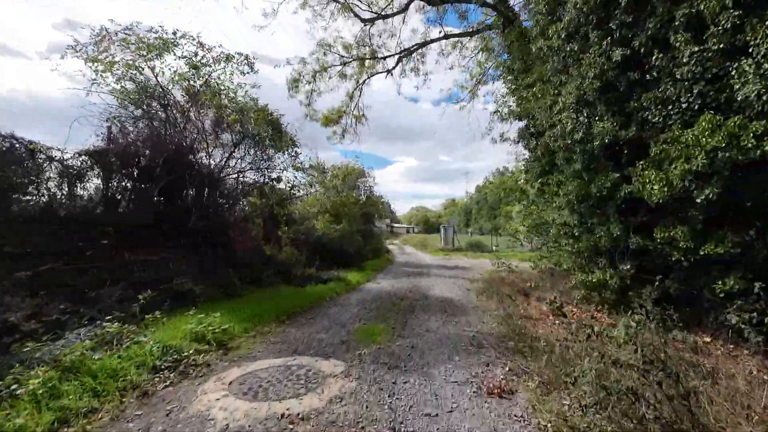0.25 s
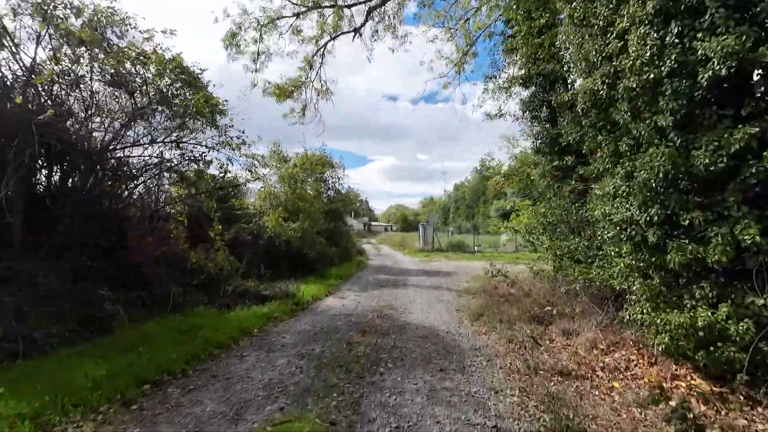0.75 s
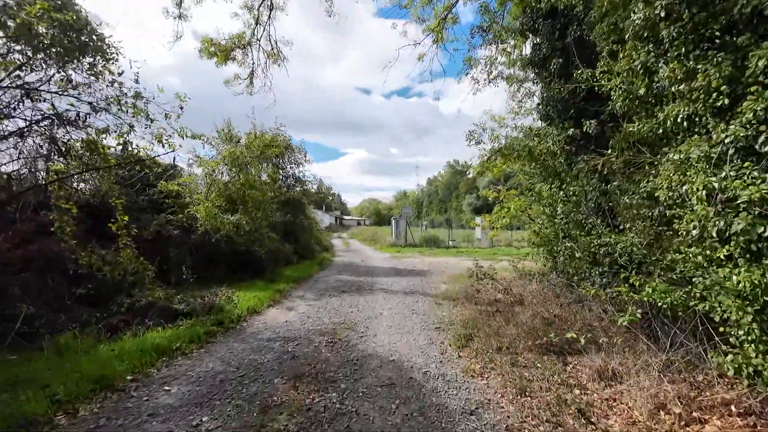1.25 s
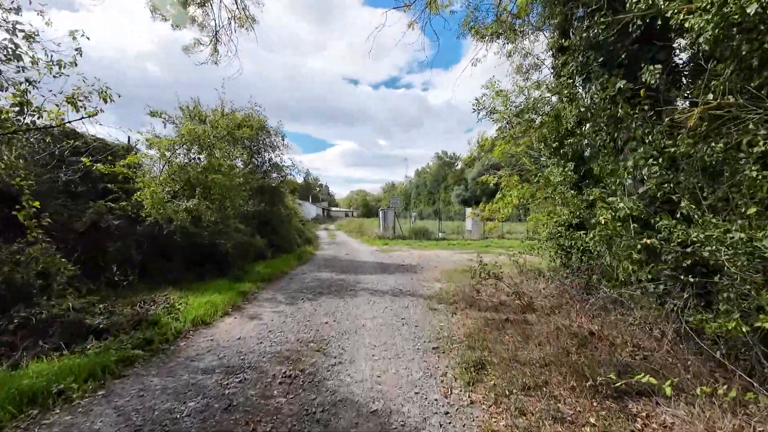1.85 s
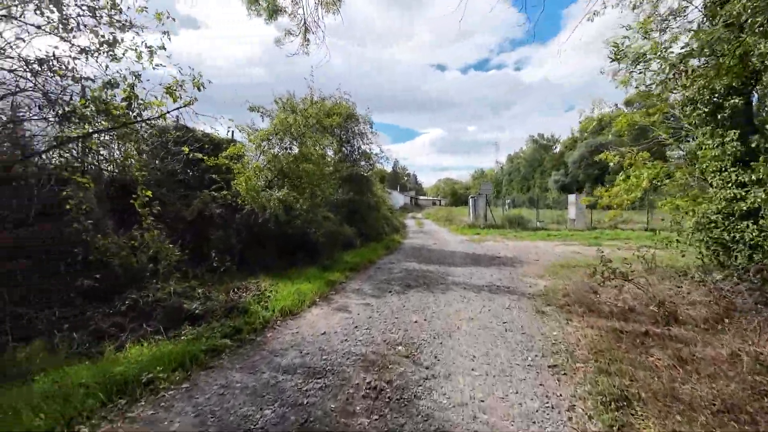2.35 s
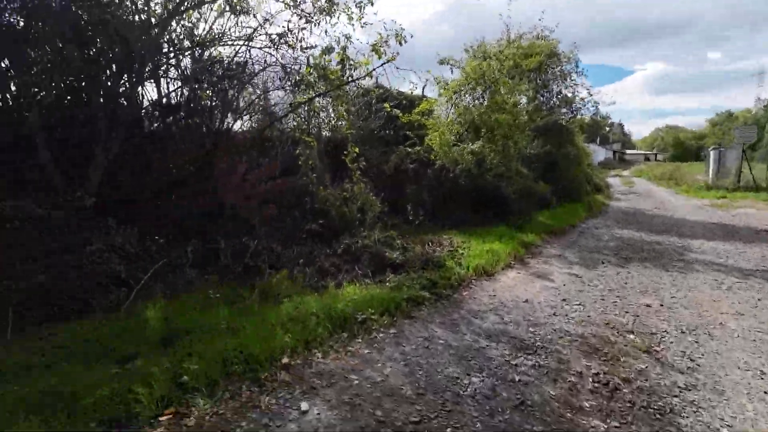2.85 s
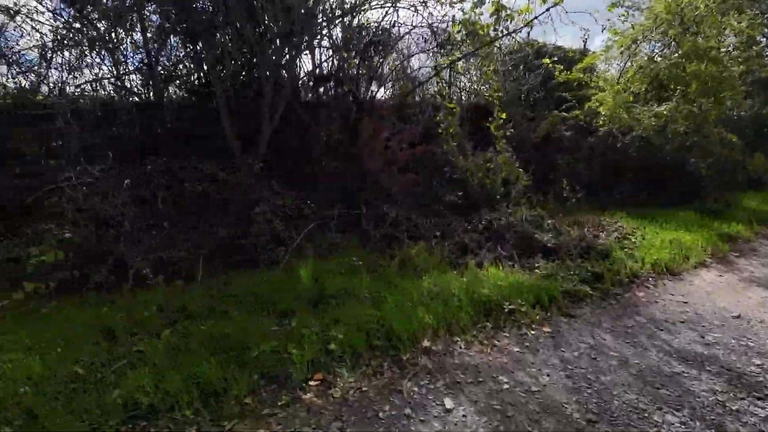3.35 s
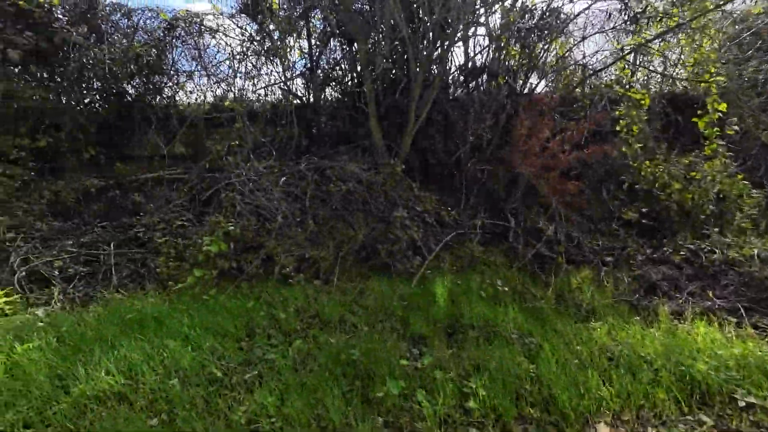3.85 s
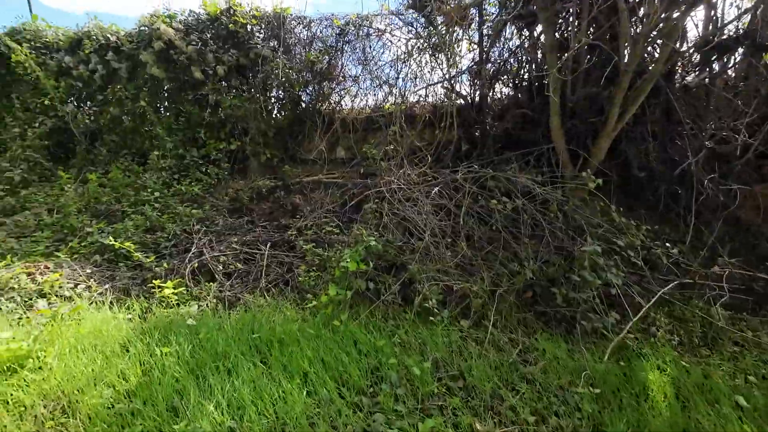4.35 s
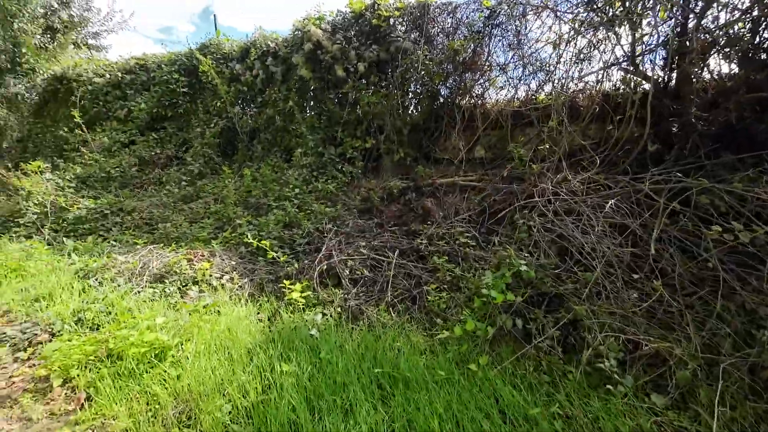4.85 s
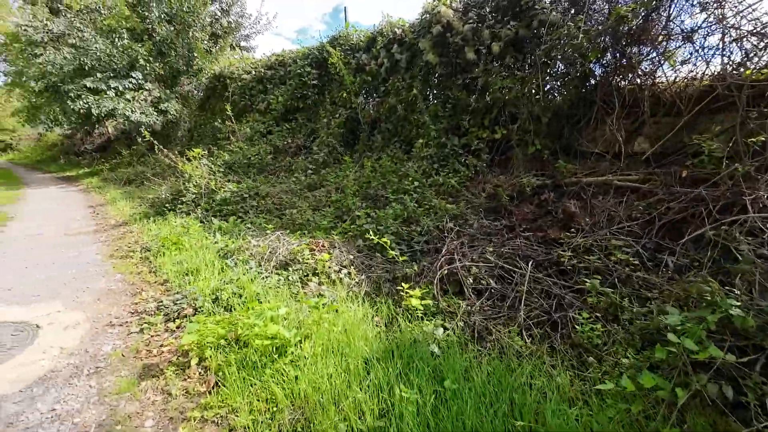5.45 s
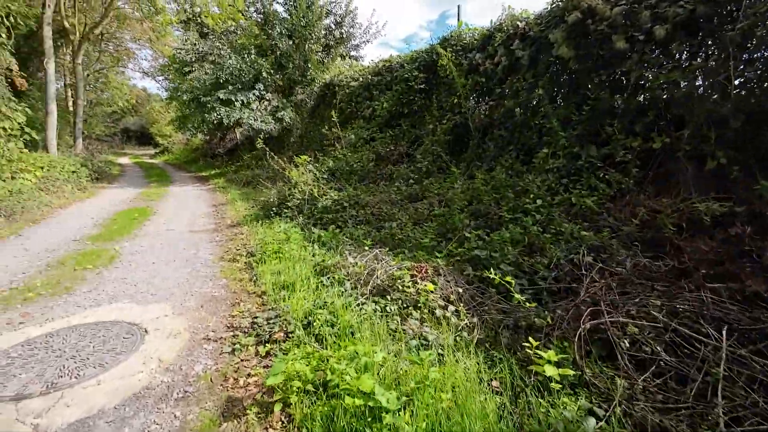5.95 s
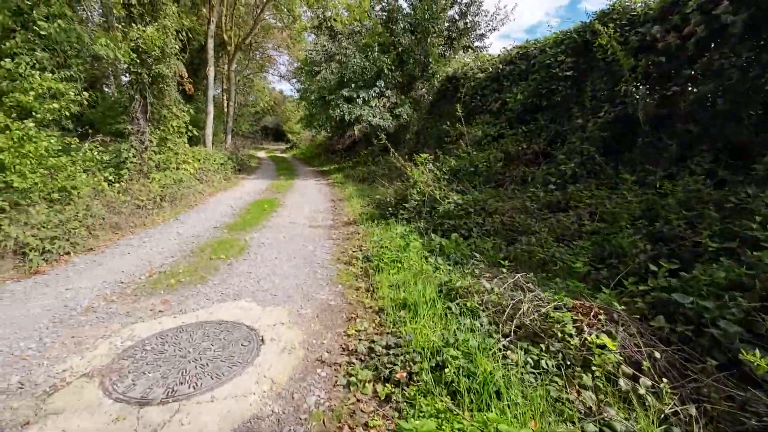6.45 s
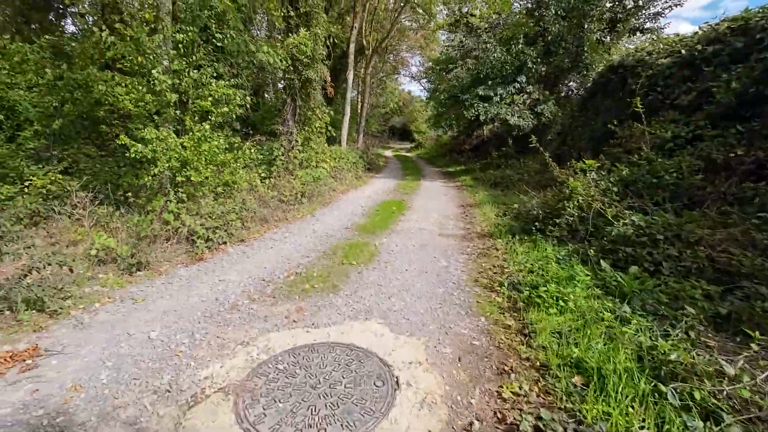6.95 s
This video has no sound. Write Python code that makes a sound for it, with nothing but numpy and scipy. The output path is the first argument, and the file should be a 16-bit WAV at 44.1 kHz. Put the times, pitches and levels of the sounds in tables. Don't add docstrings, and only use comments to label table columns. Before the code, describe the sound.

A microphone mounted on a bicycle frame picks up rumbling jolts, tyre crunch and sharp snapping stones, strongest at first. The ride eases into single pops, brittle clicks and a very thin brake whine, with a clump of gravel as it turns. Then come a quiet pause, a dull knock, leafy swishes and a last scuff of stones. Dry outdoor track, no echo.

```python
import sys
import numpy as np
from scipy import signal
from scipy.fft import rfft, irfft, next_fast_len
from scipy.io import wavfile
from scipy.ndimage import uniform_filter1d, map_coordinates

SR = 44100
rng = np.random.default_rng(int(sys.argv[2]) if len(sys.argv) > 2 else 0)


def generate_wav(sig):
    pcm = np.round(np.clip(np.atleast_2d(sig).T, -1, 1) * 32767).astype(np.int16)
    wavfile.write(sys.argv[1], SR, pcm)


def boost_factor(decibels):
    exponent = np.asarray(decibels, float) / 20
    return 10 ** exponent


N = 317961

# frequency in Hz, level in dB.
CRUNCH_TONE = [(260, -26), (450, 2.5), (728, -4.5), (1320, 8), (2690, -7.5), (3140, -11), (3720, -10),
               (4500, -21), (6500, -17), (8450, -63), (14300, -120)]
# frequency in Hz, level in dB.
RUSTLE_TONE = [(1060, -43), (1800, -18), (2450, -3.5), (4470, -11), (5410, -5.5), (6850, -14), (7500, -9),
               (8910, -17.5), (9940, -12.5), (11100, -12), (13500, -23.5), (15100, -17.5), (15800, -20.5)]


def unit(x):
    return x / np.sqrt(np.mean(x ** 2) + 1e-20)


def along(points, hz):
    f, v = np.transpose(points)
    return np.interp(np.log(hz + 1), np.log(f + 1), v)


def curves(rows):
    s, *cols = np.transpose(rows)
    return [np.interp(np.arange(N) / SR, s, c) for c in cols]


def wobble(rate):
    knots = rng.standard_normal(int(N * 200 / SR) + 4)
    return map_coordinates(knots, [np.arange(N) * rate / SR])


def noise():
    return rng.standard_normal(N)


def filtered(x, response):
    m = next_fast_len(N + 8192)
    return irfft(rfft(x, m) * response(np.fft.rfftfreq(m, 1 / SR)), m)[..., :N]


def coloured(x, spectrum):
    return unit(filtered(x, lambda hz: boost_factor(along(spectrum, hz))))


def placed(s, shapes):
    at = np.round(s * SR).astype(int)[:, None] + np.arange(shapes.shape[1])
    return np.bincount(at.ravel(), shapes.ravel(), N + SR)[:N]


def pops(s, db, hz, t60, rise, size):
    t = np.arange(size) / SR
    fall = boost_factor(db[:, None] - 60 * t / t60[:, None])
    soft_start = 1 - np.exp(-(t / rise) ** 2)
    return placed(s, fall * soft_start * np.sin(2 * np.pi * hz[:, None] * t))


def grit(count, spread_db):
    s, size, sign = rng.random((count, 3)).T
    height = boost_factor(-spread_db * np.log(size + 0.0028))
    return placed(s * N / SR, (np.sign(sign - .5) * height)[:, None])


def gravel(count, centre_hz, spread, size_db, swings=3):
    s, pitch, life, size = rng.random((count, 4)).T
    hz = centre_hz * np.exp(spread * (pitch - .5))
    t60 = swings * (1 + 1.7 * life) / hz
    return unit(pops(s * N / SR, -size_db * np.log(size + 0.046), hz, t60, rise=0.0002, size=700))


def clicks(s, db, hz, above_db, below_db, t60):
    size = 2048
    t = np.arange(size) / SR
    fall = boost_factor(-60 * t / (0.32 * t60)) + 0.41 * boost_factor(-60 * t / t60)
    burst = fall * (1 - np.exp(-t / 0.00059)) * rng.standard_normal((len(s), size))
    octaves = np.log2((np.fft.rfftfreq(size, 1 / SR) + 20) / hz)
    tilt_db = np.where(octaves > 0, above_db, below_db) * octaves
    bumpy = uniform_filter1d(rng.standard_normal((len(s), size // 2 + 1)), size=40, axis=1)
    click = irfft(rfft(np.roll(burst, 64, axis=1)) * boost_factor(tilt_db + 2.4 * unit(bumpy)))
    peak = np.abs(click).max(axis=1, keepdims=True)
    return placed(s - .001, boost_factor(db[:, None] - 3.5) * click / peak)


def wind():
    # time in seconds, strength in dB.
    strength = [(0.0, -25), (0.24, -22), (0.5, -31), (0.58, -21.5), (0.66, -40), (1.02, -20), (1.06, -31),
                (1.22, -27.5), (3.17, -44.5), (4.42, -46), (5.76, -60), (6.87, -53), (6.91, -35),
                (7.21, -39)]
    # frequency in Hz, level in dB.
    buffet = [(9, -41), (15, 2), (36, 4.5), (48, -13), (70, -71), (100, -120)]
    return boost_factor(curves(strength)[0]) * unit(boost_factor(0.53 * wobble(13)) * coloured(noise(), buffet))


def ride():
    # time in seconds, strength in dB.
    shaking = [(0.0, -23), (0.2, -22), (0.7, -29), (1.32, -28.5), (1.55, -36), (1.83, -33.5), (1.91, -36),
               (3.23, -42.5), (4.36, -39.5), (4.54, -32.5), (4.62, -44), (5.0, -48.5), (5.14, -38),
               (5.34, -53.5), (6.65, -46), (6.73, -49.5), (6.99, -34), (7.21, -42)]
    # time in seconds, crunch in dB.
    loose = [(0.0, -34), (0.14, -32.5), (0.38, -35), (0.8, -33.5), (1.36, -36.5), (1.97, -42.5),
             (2.27, -43.5), (2.55, -39.5), (2.89, -47), (3.21, -53), (4.4, -40), (4.6, -52.5),
             (5.38, -56.5), (6.14, -48.5), (6.43, -53), (7.21, -47.5)]
    # frequency in Hz, level in dB.
    rumble_tone = [(25, -22), (46, -0.5), (68, 2), (84, 1), (100, -3.5), (189, -13), (300, -17), (390, -24),
                   (660, -120)]
    # frequency in Hz, level in dB.
    drone_tone = [(76, -20), (130, 1.5), (231, -9.5), (385, -4.5), (600, -5.5), (900, -12), (1170, -11.5),
                  (1980, -120)]
    # centre in Hz, half width in Hz, level in dB.
    tube_rows = [
        (394, 14, -9.5),
        (743, 11, -10),
    ]

    def tubes(hz):
        return 1 + sum(boost_factor(db) / (1 + 1j * (hz - centre) / width) for centre, width, db in tube_rows)

    rumble_db, crunch_db = curves(shaking)[0], curves(loose)[0]
    drone_gain = np.hypot(boost_factor(-42.5 + 0.75 * (rumble_db + 28.0)), boost_factor(-53.5))
    rustle_db = -61.5 + 0.69 * (crunch_db + 41.5)

    bumps = wobble(14)
    shake = coloured(noise(), rumble_tone)
    lopsided = shake + 0.19 * (shake ** 2 - 1)
    rumble = unit(boost_factor(1.5 * bumps) * lopsided)

    ringing = filtered(coloured(noise(), drone_tone), tubes)
    drone = unit(boost_factor(2.3 * bumps + 1.27 * wobble(40)) * ringing)

    crushed = 0.65 * gravel(count=5000, centre_hz=1300, spread=1.27, size_db=3.5)
    crushed += 0.5 * coloured(noise(), CRUNCH_TONE)
    crunch = unit(boost_factor(0.5 * bumps + 2.96 * wobble(55)) * crushed)

    blades = noise() + unit(grit(count=3000, spread_db=1.5))
    rustle = unit(boost_factor(2.2 * bumps + 0.89 * wobble(21.74)) * coloured(blades, RUSTLE_TONE))
    return (boost_factor(rumble_db + 0.98) * rumble + drone_gain * drone
            + boost_factor(crunch_db - 2.77) * crunch + boost_factor(rustle_db) * rustle)


def brushes():
    # peak time in seconds, rise and fall in seconds per 20 dB (a negative fall holds), peak in dB.
    swells = [(2.894, 0.005, 0.09, -48.5), (3.058, 0.016, 1, -63), (3.505, 0.0086, 0.8, -68),
              (4.7, 0.48, 2, -62), (5.69, 0.2, 0.28, -50.5), (5.98, 0.15, 0.6, -57), (6.4, 2, 5.5, -67.5),
              (6.75, 0.18, 0.5, -53), (7.19, 0.17, -5, -55.5)]
    t = np.arange(N) / SR
    leaves = noise() + 1.34 * unit(grit(count=5000, spread_db=0.5))
    leaves = unit(boost_factor(1.77 * wobble(45)) * coloured(leaves, RUSTLE_TONE))
    swell = np.zeros(N)
    for s, rise, fall, db in swells:
        away = np.maximum((s - t) / rise, (t - s) / fall)
        swell += boost_factor(db - 20 * away.clip(0, 6))
    return swell * leaves


def freewheel():
    # time in seconds, clicks per second.
    coasts = [
        [(1.525, 16), (1.95, 14.8), (2.25, 10)],
        [(4.563, 32.4), (4.86, 35), (5.04, 17)],
    ]
    # frequency in Hz, level in dB.
    tones = [
        [(9000, -30), (12500, -6), (15000, 0)],
        [(3000, -4), (5500, 2), (15000, -8)],
    ]
    levels_db, widths_s = [-69, -57.5], [.008, 0.004]
    t, out = np.arange(N) / SR, np.zeros(N)
    for rows, db, width, tone in zip(coasts, levels_db, widths_s, tones):
        coasting = (t > rows[0][0]) * (t < rows[-1][0])
        teeth = np.cumsum(curves(rows)[0] * coasting) / SR
        s = np.flatnonzero(np.diff(np.floor(teeth))) / SR
        u = np.arange(-800, 800) / SR / width
        height = boost_factor(db + 1.9 * rng.standard_normal((len(s), 1)))
        puffs = placed(s - 800 / SR, height * np.exp(-u * u))
        out += puffs * coloured(noise(), tone)
    return out


def brake():
    # start in seconds, length in seconds, level in dB.
    drags = [
        (3.72, .16, -68),
        (3.99, .05, -71),
        (4.12, .16, -67),
        (4.36, .2, -69),
    ]
    sing_hz, fade_s = 15740, .015
    t = np.arange(N) / SR
    grips = np.zeros(N)
    for s, length, db in drags:
        inside = np.minimum(t - s, s + length - t)
        grips += boost_factor(db) * np.clip(inside / fade_s + .5, 0, 1)
    graze = boost_factor(-77) * (t > 3.9) * (t < 4.62)
    return boost_factor(1) * (grips + graze) * np.sin(2 * np.pi * sing_hz * t + .3 * wobble(20))


def ticks():
    # time in seconds, rattle peak in dB, push in dB.
    jolts = [(0.0302, -22, -7.5), (0.0686, -31.5, -32), (0.099, -27.5, -23), (0.1257, -39, -9.5),
             (0.158, -32, -14.5), (0.1892, -39, -14.5), (0.2334, -34, -12), (0.2537, -29.5, -10.5),
             (0.2935, -33, -10), (0.348, -36, -35), (0.382, -29.5, -7), (0.418, -35, -15),
             (0.4428, -31, -13), (0.4872, -32, -15), (0.5141, -33, -18), (0.53, -31, -15),
             (0.546, -23.5, -17), (0.5866, -44, -16), (0.6114, -28, -18.5), (0.6666, -30.5, -25),
             (0.6948, -34, -28), (0.7563, -31.5, -25), (0.83, -37, -31), (0.852, -42, -22),
             (0.8702, -29, -9.5), (0.9496, -31, -12), (0.9894, -40, -32), (1.046, -41, -36),
             (1.1507, -32, -12), (1.1915, -34, -21), (1.2264, -31, -18.9), (1.34, -28, -8.5),
             (1.3999, -32, -16), (1.6326, -37, -34), (1.731, -47, -38), (1.7593, -38, -15),
             (1.8034, -40, -20.5), (1.8293, -37.8, -17), (1.872, -39, -30), (1.8906, -39, -22),
             (1.93, -44, -20), (1.968, -39, -23), (2.153, -45, -24)]
    # time in seconds, peak in dB, brightest frequency in Hz.
    twigs = [(2.299, -34.5, 4850), (2.486, -45, 2780), (2.7717, -36, 3090), (2.933, -37, 3150),
             (3.055, -23.5, 6300), (3.077, -40, 12000), (3.107, -37, 8050), (3.22, -33.5, 10200),
             (3.501, -28.5, 6100), (3.5205, -26.5, 11000), (3.6, -32, 4000), (3.806, -36.5, 3500),
             (4.275, -28, 6400), (4.44, -31, 3000), (4.4796, -35, 5500), (5.034, -50, 10000),
             (5.08, -48, 9500), (5.122, -33, 2900), (5.132, -42, 2400), (5.198, -44, 10000),
             (5.209, -51, 9600), (5.336, -45.5, 8000), (6.427, -39, 3800), (6.314, -34, 2600),
             (6.215, -38, 3500), (2.476, -46, 3000), (4.508, -38, 3400), (3.677, -42, 2500),
             (6.991, -29, 2930), (5.5992, -36, 10500), (5.653, -29, 5100), (5.683, -28, 5670),
             (5.732, -30, 5300), (5.904, -32, 5800), (5.974, -31, 10100), (6.2697, -32, 4300),
             (6.366, -35.5, 10700), (6.393, -37.5, 10100), (6.519, -33.5, 3700), (6.603, -36, 5060),
             (6.7358, -30.5, 5300), (6.938, -25.5, 15600), (7.188, -30.5, 3170), (7.157, -35.5, 5500)]
    # time in seconds, peak in dB, brightest frequency in Hz.
    stems = [(2.642, -42, 5200), (2.7422, -41, 5060), (2.9911, -46, 5130), (3.1244, -48, 5740),
             (3.179, -47, 9950), (3.29, -49, 5130), (3.5374, -38, 6270), (3.6214, -47, 6430),
             (3.6755, -48, 5230), (3.7504, -46, 11510), (3.823, -37, 4000), (4.0572, -39, 4930),
             (4.0826, -45, 5440), (4.2323, -45, 7610), (4.3146, -47, 7030), (4.3894, -59, 7560),
             (4.4244, -45, 5800), (4.463, -41, 5260), (4.506, -48, 5170), (3.986, -42, 4500),
             (4.682, -49, 5110), (4.643, -47, 6300), (4.8955, -50, 5500), (5.048, -53, 9500),
             (5.272, -52, 12000), (5.225, -49, 7800), (5.4076, -43.5, 11440), (5.5636, -42, 7350),
             (5.8287, -48.5, 7610), (5.8641, -46, 6160), (5.9504, -53, 5750), (6.062, -49, 5610),
             (6.2527, -39, 5880), (6.571, -48, 8150), (6.6265, -42, 5160), (6.6752, -41, 5220),
             (6.797, -40, 5400), (6.9914, -49, 11280), (7.0893, -42, 9700)]
    s, db, push_db = np.transpose(jolts)
    t = np.arange(-800, 800) / SR
    crest = np.exp(-(t / 0.0012) ** 2)
    dip = 0.59 * np.exp(-((t + 0.00564) / 0.0019) ** 2)
    push = boost_factor(push_db - 2.5)[:, None] * (crest - dip)
    rattle = clicks(s, db + 3.5, 3100, above_db=-10.5, below_db=7.5, t60=0.0086)

    twig_s, twig_db, twig_hz = np.transpose(twigs)
    twig = clicks(twig_s, twig_db, twig_hz[:, None], above_db=-11.5, below_db=9, t60=0.038)
    stem_s, stem_db, stem_hz = np.transpose(stems)
    stem = clicks(stem_s, stem_db + 2.5, stem_hz[:, None], above_db=-14.0, below_db=9, t60=0.017)
    return rattle + placed(s + 0.0017 - 800 / SR, push) + twig + stem


def spoke():
    # time in seconds, peak in dB, pitch against the tight spoke.
    pings = [
        (6.271, -37, 0.97),
        (7.041, -35, 0.63),
    ]
    # frequency in Hz, level in dB, time to fall 60 dB in seconds.
    tones = [(4300, -4, 0.062), (5100, -7, .022), (5840, -2.5, 0.038), (7550, -9, 0.02)]
    hz, level_db, t60 = np.transpose(tones)
    return sum(pops(np.full(len(hz), s), db + level_db, pitch * hz, t60, rise=0.0006, size=4000)
               for s, db, pitch in pings)


def knock():
    # time in seconds, peak in dB.
    contacts = [
        (5.1195, -24.5),
        (5.131, -29.5),
        (5.161, -43),
        (5.224, -47),
        (7.056, -31),
    ]
    # frequency in Hz, level in dB, time to fall 60 dB in seconds.
    tones = [(83.8, -2.5, 0.18), (420, 0, 0.055), (560, 1, 0.059), (712, -11, 0.14), (850, -10.5, 0.26),
             (960, -6.5, 0.067), (1736, 0, 0.025), (2320, -9.5, 0.024), (2500, -9, 0.024),
             (2750, -7, 0.021), (3500, -21, 0.025)]
    s, db = np.transpose(contacts)
    t = np.arange(SR // 3) / SR
    ring = np.zeros((len(s), len(t)))
    for row in ring:
        for hz, level, t60 in tones:
            fall = boost_factor(level + rng.normal(0, 2.5) - 60 * t / t60)
            row += fall * np.sin(2 * np.pi * hz * rng.normal(1, hz * 1e-5) * t)
    crack = boost_factor(3.5 - 60 * t / 0.061) * rng.standard_normal(ring.shape)
    ring += filtered(crack, lambda hz: 1 / (1 + (hz / 2800) ** 4))[:, :len(t)]
    return placed(s, boost_factor(db - 0.5)[:, None] * (1 - np.exp(-t / 0.0013)) * ring)


def ruts():
    # time in seconds, peak in dB, pitch in Hz.
    drops = [(0.546, -13.5, 230), (0.934, -13.5, 230), (1.725, -18, 43.4), (1.755, -25, 71.4),
             (1.776, -22, 228), (1.829, -19, 258), (1.799, -26, 60.4), (2.133, -23, 35), (3.819, -26.5, 73),
             (4.44, -25, 91), (4.521, -21.5, 83), (4.871, -37, 73), (6.631, -28, 430)]
    s, db, hz = np.transpose(drops)
    return pops(s, db + 2.5, hz, 7 / hz, rise=0.0024, size=8000)


def scuffs():
    # time in seconds, level in dB, hollow part in dB against it.
    scrapes = [
        [(2.6, -47, -8), (2.65, -30, -6.5), (2.7, -47, -17)],
        [(4.19, -58, -20), (4.22, -44, -16), (4.39, -47, -15), (4.448, -26.5, -22), (4.478, -30.5, -17),
         (4.62, -52, -12)],
        [(6.268, -38, 7.5), (6.33, -45, -23), (6.35, -56, -6)],
        [(6.829, -48, 7), (6.87, -53.5, 9), (6.9, -31, -3), (6.92, -40, -1), (6.98, -41, 4), (7.008, -24.5, -4),
         (7.028, -40, -1), (7.06, -32, 4), (7.1, -53, 1.5)],
    ]
    t = np.arange(N) / SR
    clumps = boost_factor(4.1 * wobble(70))
    stony = gravel(count=6000, centre_hz=1100, spread=0.56, size_db=4.0, swings=4.8)
    bright = unit(clumps * (stony + 0.45 * coloured(noise(), CRUNCH_TONE)))
    hollow = unit(clumps * gravel(count=3000, centre_hz=470, spread=0.14, size_db=0.5, swings=4.3))
    out = np.zeros(N)
    for rows in scrapes:
        level_db, hollow_db = curves(rows)
        during = (t > rows[0][0]) * (t < rows[-1][0])
        out += during * boost_factor(level_db - 4.5) * (bright + boost_factor(hollow_db + 6.5) * hollow)
    return out


def stones():
    # time in seconds, # peak in
    # dB, pitch in Hz.
    stone_rows = [(0.032, -18, 715), (0.074, -25, 1050), (0.204, -18.5, 1570), (0.279, -12, 990),
                        (0.346, -20.5, 900), (0.42, -14.5, 1540), (0.518, -19, 1440), (0.566, -15.5, 1160),
                        (0.633, -13.5, 1260), (0.845, -16, 1250), (1.065, -15.5, 1400), (1.078, -8.5, 1160),
                        (1.164, -15.5, 1320), (1.257, -16.5, 1320), (1.2822, -5.5, 1530), (1.331, -16, 1200),
                        (1.426, -16, 1250), (1.468, -8, 1070), (1.543, -20, 1100), (1.5775, -6.5, 1400),
                        (1.742, -27.5, 1770), (1.907, -25.5, 1220), (2.2, -16, 1300), (2.298, -15, 1300),
                        (2.413, -17, 1210), (2.45, -11, 1070), (2.487, -19, 1010), (2.613, -26.5, 1480),
                        (2.639, -21, 1190), (2.714, -15.5, 1250),
                        (3.392, -28, 1300), (3.495, -19.5, 1100), (3.604, -16, 1170), (3.871, -25.5, 1160),
                  (3.985, -20.5, 1240), (4.0563, -13.5, 1210), (4.105, -11.5, 1080), (4.282, -14, 1310),
                  (4.348, -15.5, 1170), (4.406, -18, 1180), (4.438, -10.5, 1260), (4.49, -22.5, 1430),
                  (4.514, -23, 925), (4.561, -22, 1280), (5.115, -21, 446), (5.996, -34, 684),
                  (6.205, -23, 1290), (6.27, -12, 1430), (6.315, -31, 695), (6.53, -26.5, 470),
                  (6.603, -18, 1020), (6.827, -29, 480), (6.854, -18, 1100), (6.883, -29, 1180),
                  (6.897, -17, 1100), (6.905, -21, 1150), (6.907, -12, 1040), (6.993, -28, 470),
                  (7.005, -27, 520), (7.01, -23, 1100), (7.055, -22, 884)]
    # time in
    # seconds, peak in dB, pitch in Hz.
    more_stone_rows = [(0.032, -12, 1250), (0.054, -17, 1690), (0.077, -16.5, 1170), (0.1, -20.5, 1060),
                       (0.159, -21, 870), (0.213, -16.5, 1500), (0.276, -14, 1630), (0.307, -15.5, 1250),
                       (0.328, -28, 1080), (0.347, -17.9, 1150), (0.372, -24, 790), (0.49, -25, 1650),
                       (0.494, -23, 1700), (0.52, -19, 1420), (0.576, -13.5, 1340), (0.586, -20.5, 1320),
                       (0.685, -24, 1050), (0.71, -23, 1420), (0.728, -17, 1100), (0.76, -31, 1270),
                       (0.791, -18.5, 1190), (0.831, -20, 1230), (0.852, -14, 1300), (0.913, -22.5, 1050),
                       (0.961, -20, 1130), (0.985, -22, 1530), (0.991, -24, 1350), (1.01, -32, 1200),
                       (1.021, -21, 1710), (1.045, -31, 1230), (1.092, -21, 980), (1.152, -34, 1400),
                       (1.192, -24, 1000), (1.332, -16, 1710), (1.387, -24, 1130), (1.423, -21, 1780),
                       (1.455, -34, 960), (1.467, -21, 1710), (1.494, -27, 1700), (1.509, -20, 1480),
                       (1.523, -25, 1890), (1.263, -25, 2000), (1.632, -41, 1850), (1.657, -28, 1300),
                       (1.696, -30, 1840), (1.829, -35, 1720), (1.875, -31, 2470), (1.986, -24.2, 1400),
                       (2.276, -26, 1670), (2.285, -25, 1700), (2.329, -23, 1300), (2.405, -26, 860),
                            (2.449, -24, 1790), (2.477, -27, 1770), (2.487, -20.5, 2550), (2.534, -21, 1230),
                            (2.562, -24.2, 1300), (2.572, -33, 800), (2.608, -29, 1700), (2.613, -30, 1420),
                            (2.668, -28.2, 1530), (2.685, -22.5, 1320), (2.725, -23, 1440), (2.827, -28, 1220),
                            (2.909, -28.5, 1300), (3.069, -38, 1200), (3.123, -39, 1340), (3.207, -31.5, 1330),
                            (3.524, -31, 2620), (3.54, -27.5, 1010), (3.604, -25, 2260), (3.652, -34.7, 1330),
                            (3.676, -31.5, 2340), (3.691, -28, 1410), (3.75, -28, 1500), (3.771, -23.5, 1030),
                            (3.823, -32, 1040), (3.942, -38, 1760), (3.966, -41, 1180), (3.98, -26, 1740),
                            (4.082, -27, 1000), (4.119, -20.5, 1070), (4.241, -31, 1390), (4.303, -29, 870),
                            (4.369, -24, 1150), (4.401, -19, 1430), (4.414, -26.1, 1190), (4.427, -18, 1700),
                            (4.459, -18, 1190), (4.506, -26.5, 2850), (4.524, -23, 1320), (4.575, -27, 1380),
                            (4.895, -35.5, 2240), (5.996, -29.5, 2330), (6.001, -30, 1430), (6.216, -32, 1360),
                            (6.313, -37, 1700), (6.331, -33, 940), (6.428, -32.5, 1210), (6.661, -37.5, 1220),
                            (6.829, -36, 720), (6.845, -38, 1240), (6.858, -20.5, 1100), (6.959, -21.5, 1030),
                            (6.991, -20, 1190), (7.016, -25, 1140), (7.019, -25.5, 1150)]
    s, db, hz = np.transpose(stone_rows + more_stone_rows)
    snap = pops(s + 0.001306, db + 9.5, hz, 6.49 / hz, rise=0.66 / hz[:, None], size=900)
    wall = -pops(s + 0.00088, db - 20.0, 0.5 * hz, 13 / hz, rise=0.00049, size=900)

    t = np.arange(-1000, 2000) / SR
    away = np.maximum(t / 0.065, .2 - t / 0.0094)
    scrabble = boost_factor(db[:, None] - 24.5 - 60 * away) * rng.standard_normal((len(s), len(t)))
    scrabble = filtered(placed(s + 0.001466 - 1000 / SR, scrabble),
                        lambda hz: boost_factor(along(CRUNCH_TONE, 1.21 * hz) + 18.0 - 0.0017 * hz))
    return snap + wall + scrabble


def scene():
    # frequency in Hz, left minus right in dB.
    leaning = [(100, 0.93), (200, 0.7), (400, -0.02), (5000, 0.05)]
    # frequency in Hz, level of the delayed copy in dB.
    apart = [(60, -28), (400, -44), (700, -56), (1300, -48), (3500, -50), (6000, -29), (9000, -28),
             (12500, -30), (15000, -13)]
    mid = wind() + ride() + brushes() + freewheel() + brake() + ticks()
    mid += spoke() + knock() + ruts() + scuffs() + stones()
    delayed = filtered(np.roll(mid, 900), lambda hz: boost_factor(along(apart, hz)))
    side = unit(boost_factor(5.3 * wobble(12))) * delayed
    half = np.array([[.5], [-.5]])
    both = filtered(mid[None], lambda hz: boost_factor(half * along(leaning, hz)))
    return both + np.array([side, -side])


def top_cut(x):
    return signal.sosfilt(signal.butter(12, 17010, fs=SR, output="sos"), x)


def record(dry):
    top_hz = 15850
    kept = filtered(dry, lambda hz: np.where(hz < top_hz, 1, boost_factor(-27 - .012 * (hz - top_hz))))
    return top_cut(kept)


dry = scene()
out = record(dry)
generate_wav(out)
```